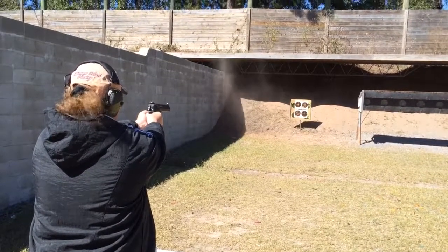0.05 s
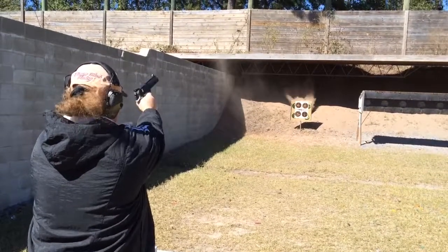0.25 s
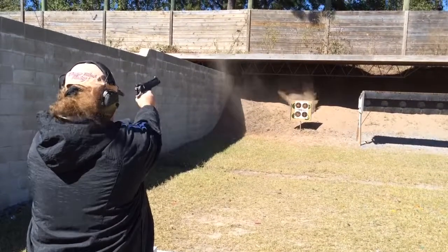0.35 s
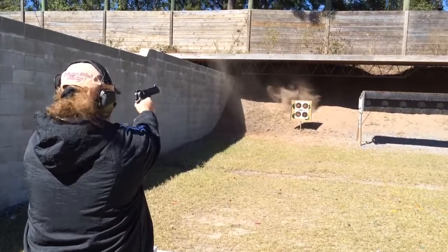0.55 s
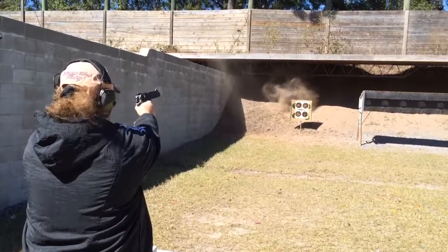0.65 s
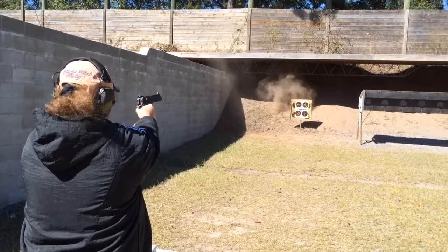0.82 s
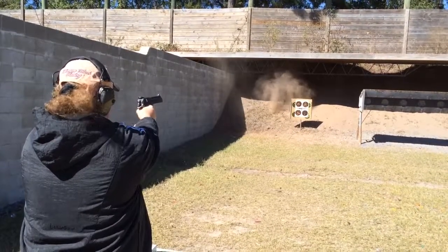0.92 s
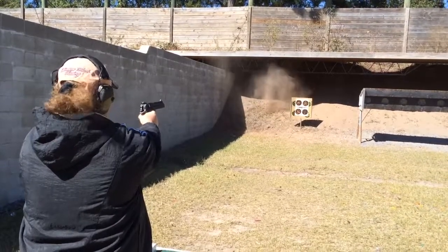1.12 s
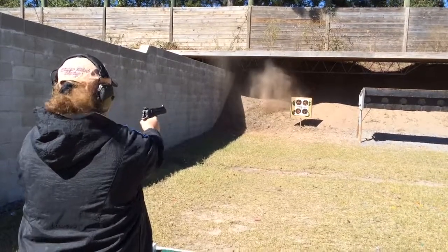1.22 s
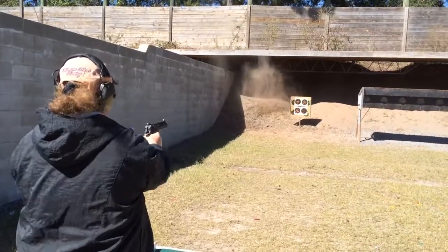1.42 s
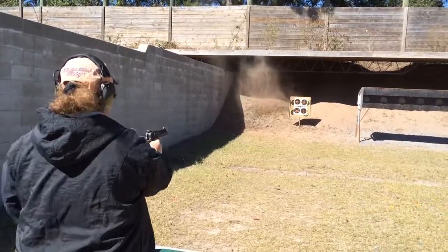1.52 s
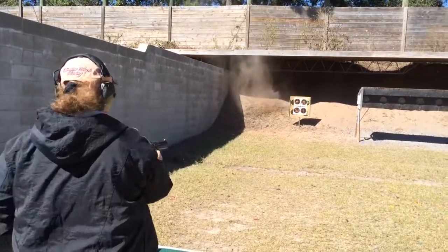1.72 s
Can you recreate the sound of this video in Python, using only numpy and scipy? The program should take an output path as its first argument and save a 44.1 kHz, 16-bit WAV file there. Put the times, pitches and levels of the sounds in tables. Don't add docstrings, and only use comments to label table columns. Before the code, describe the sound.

A single handgun shot blasts close to a phone microphone at an outdoor range, flattened by overload, followed by dense wall and berm echoes, a hollow low boom, then faint distant echoes and rising hiss.

```python
import sys
import numpy as np
from scipy import signal
from scipy.fft import rfft, irfft, next_fast_len
from scipy.io import wavfile
from scipy.ndimage import uniform_filter1d, map_coordinates

SR = 44100
rng = np.random.default_rng(int(sys.argv[2]) if len(sys.argv) > 2 else 0)


def convert_level_to_amplitude(level_db):
    exponent = np.asarray(level_db, float) / 20
    return 10 ** exponent


def output_pcm(signal):
    pcm = np.clip(np.atleast_2d(signal).T, -1, 1) * 32767
    wavfile.write(sys.argv[1], SR, np.round(pcm).astype(np.int16))


N = 77175

SHOT_S = 0.2262
TOP_HZ = 16100


def unit(x):
    return x / np.sqrt(np.mean(x ** 2) + 1e-20)


def along(points, hz):
    f, v = np.transpose(points)
    return np.interp(np.log(hz + 1), np.log(f + 1), v)


def curve(rows):
    return np.interp(np.arange(N) / SR, *np.transpose(rows))


def wobble(rate):
    knots = rng.standard_normal(int(N * rate / SR) + 4)
    return map_coordinates(knots, [np.arange(N) * rate / SR])


def filtered(x, response):
    m = next_fast_len(N + SR // 2)
    return irfft(rfft(x, m) * response(np.fft.rfftfreq(m, 1 / SR)), m)[..., :N]


def swell(t, rise, t60):
    t = np.maximum(t, 0)
    return (1 - np.exp(-t / rise)) * convert_level_to_amplitude(-60 * t / t60)


def clusters(rows, rise, blast_share, smear=0):
    blast_s = 0.00072
    u = np.arange(400) / SR / blast_s
    blast = (1 - u) * np.exp(-u)
    t, out = np.arange(N) / SR, np.zeros(N)
    for start, db, low_hz, high_hz, t60 in rows:
        noise, size = rng.standard_normal((2, N))
        hits = size ** 3 * (np.abs(size) > 2)
        pulses = np.convolve(hits, blast)[:N]
        edges = [low_hz, min(high_hz, TOP_HZ)]
        band = signal.butter(N=2, Wn=edges, btype='band', fs=SR, output='sos')
        mixed = noise + blast_share * unit(pulses)
        sound = unit(signal.sosfilt(np.vstack([band, band]), mixed))
        out += convert_level_to_amplitude(db) * swell(t - start, rise + smear * (start - SHOT_S), t60) * sound
    return out


# start in seconds, level in dB,
# lowest and highest frequency in Hz, time to fade by 60 dB in seconds.
ECHOES = [(.2262, 13, 697, 15700, 0.13), (.231, 9, 395, 3770, 0.066), (.238, 14, 430, 7440, 0.08),
          (.251, 7.5, 383, 2290, 0.39), (.277, 4, 120, 14500, 0.3), (.29, 9.5, 970, 4630, 0.32),
          (.315, 8.5, 395, 943, 0.49), (.34, 5.5, 864, 2620, 0.48), (.4, 6.5, 382, 3440, 0.35),
          (.42, 9, 231, 379, 0.3), (.52, -13, 300, 3460, 0.51), (.59, -4.5, 393, 836, 0.26),
          (.665, -3.5, 55, 720, 0.26)]


def blast_and_echoes():
    crackle_db, crackle_s = 3, 0.08
    away = np.abs(np.arange(N) / SR - SHOT_S)
    crackle = crackle_db * np.exp(-away / crackle_s) * wobble(250)
    return clusters(ECHOES, rise=0.0008, blast_share=0.96, smear=0.04) * convert_level_to_amplitude(crackle)


# frequency in Hz, level in dB per Hz.
TAIL = [(25, 0), (60, -10), (150, 2), (400, 3.5), (1000, -16), (3000, -14.5), (9000, -22.5), (16000, -42)]
# frequency in Hz, rise time in seconds.
TAIL_RISE = [(100, 0.16), (400, 0.15), (1000, 0.013), (10000, 0.05)]
# frequency in Hz, time to fade by 60 dB in seconds.
DECAY = [(60, 0.88), (200, 1.035), (600, 1.043), (1500, 1.212), (2600, 0.88), (5000, 0.66), (9000, 0.54),
         (15000, 0.31)]


def tail():
    hz, t, z = signal.stft(rng.standard_normal(N), SR, nperseg=256)
    colour = convert_level_to_amplitude(along(TAIL, hz))[:, None]
    colour = colour / np.sqrt(np.mean(colour ** 2))
    patches = uniform_filter1d(rng.standard_normal(z.shape), size=9, axis=0)
    patches = unit(uniform_filter1d(patches, size=8, axis=1))
    shape = swell(t - SHOT_S, along(TAIL_RISE, hz)[:, None], along(DECAY, hz)[:, None])
    z = z * colour * shape * convert_level_to_amplitude(0.62 * patches)
    sound = signal.istft(z, SR, nperseg=256)[1][:N]
    return convert_level_to_amplitude(16.5) * sound * (np.arange(N) > SHOT_S * SR)


# frequency in Hz, level in dB,
# change of level in dB per second on top of the shared fade.
ROOF = [(130.4, -6.5, -4.5), (177.9, -1.5, 2.5), (218.1, 0.5, -1), (259.8, -3.5, -26), (291.6, 2.5, -14.5),
        (349.6, -9.5, 4), (390, -6.5, -2), (437.8, -4, -8), (498, -12, 8), (535, -6.5, -7.5),
        (624, -4.5, -17)]
# time in seconds, level in dB.
ROOF_LEVEL = [
    (.37, -22),
    (.41, 3.5),
    (.46, -1),
    (.56, -8.5),
    (.7, -13.5),
    (.8, -21),
    (1.0, -30.5),
    (1.2, -47),
    (1.3, -63),
]


def roof():
    waver_hz, flutter_db = 9, 4.5
    t = np.arange(N) / SR
    peak_s = ROOF_LEVEL[1][0]
    ring = np.zeros(N)
    for hz, db, fade in ROOF:
        level = convert_level_to_amplitude(db + fade * (t - peak_s) + flutter_db * wobble(22.19))
        pitch = hz + waver_hz * wobble(29.91)
        ring += level * np.sin(2 * np.pi * np.cumsum(pitch) / SR)
    return convert_level_to_amplitude(curve(ROOF_LEVEL)) * ring * (t > SHOT_S)


# start in seconds, level in dB, lowest and highest frequency in
# Hz, time to fade by 60 dB in seconds.
LEAD = [
    (.204, -39.5, 1000, 15000, 0.1),
    (.214, -25.5, 100, 1740, 0.11),
]


def lead_in():
    return clusters(LEAD, rise=0.00067, blast_share=0)


# start in seconds, level in dB,
# lowest and highest frequency in Hz, time to fade by 60 dB in seconds.
CASE = [
    (.905, -42, 10900, 15000, 0.0041),
    (1.2022, -44, 9900, 16000, 0.0087),
    (1.2028, -66, 400, 8000, 0.013),
]


def spent_case():
    return clusters(CASE, rise=0.00027, blast_share=0)


# start in seconds, level in dB,
# lowest and highest frequency in Hz, time to fade by 60 dB in seconds.
FAR = [
    (.98, -24, 150, 450, .3),
    (1.095, -27, 70, 140, .15),
    (1.149, -29, 430, 640, .1),
    (1.22, -38, 300, 400, .4),
    (1.3, -40, 300, 680, 1.2),
]


def far_trees():
    return clusters(FAR, rise=0.004, blast_share=0.96)


# frequency in Hz, level in dB per Hz.
HISS = [(30, -10), (320, -8), (550, 1.5), (1400, -2), (2400, -7), (3000, -13.5), (7000, -18), (15500, -31)]
# frequency in Hz, level in dB per Hz.
RUMBLE = [(25, -30), (65, 1.5), (110, -7.5), (170, -15), (300, -24), (1000, -73)]
# time in seconds, level in dB.
GUSTS = [
    (0, -42),
    (.03, -46),
    (.1, -52),
    (.15, -48),
    (.18, -41),
    (.22, -44),
    (.5, -45),
    (1.2, -56),
    (1.75, -58),
]


def air():
    hiss = unit(filtered(rng.standard_normal(N), lambda f: convert_level_to_amplitude(along(HISS, f))))
    low = unit(filtered(rng.standard_normal(N), lambda f: convert_level_to_amplitude(along(RUMBLE, f))))
    hiss_level = convert_level_to_amplitude(-46 + 0.37 * wobble(9.4))
    gust_level = convert_level_to_amplitude(curve(GUSTS) + 4.9 * wobble(9.9))
    return hiss_level * hiss + gust_level * low


def scene():
    small = lead_in() + spent_case()
    answers = blast_and_echoes() + far_trees() + tail() + roof()
    return (answers + small + air())[None]


def low_pass(x):
    return signal.sosfilt(signal.butter(12, 17000, fs=SR, output="sos"), x)


# time in seconds, gain in dB.
GAIN = [
    (0, -2.5),
    (.2245, -2.5),
    (.2262, -23),
    (.46, -17),
    (.66, -17),
    (.9, -11.5),
    (1.18, 1.5),
    (1.4, 0.5),
    (1.75, 2),
]


def record(dry):
    limit_db, limit_s = -6.5, 0.0065
    clip, hardness = 0.7, 6
    low_hz, edge_hz = 35, 400
    x = dry * convert_level_to_amplitude(curve(GAIN))
    shift = round(limit_s * SR / 2) - 2
    power = np.abs(uniform_filter1d(x ** 2, round(limit_s * SR), axis=1, origin=shift))
    x = x / np.sqrt(np.sqrt(1 + (power / convert_level_to_amplitude(limit_db) ** 2) ** 2))
    x = x / (1 + np.abs(x / clip) ** hardness) ** (1 / hardness)

    def band_limits(f):
        treble = np.sin(np.pi / 2 * np.clip((TOP_HZ - f) / edge_hz, 0, 1)) ** 2
        bass = (1j * f / (low_hz + 1j * f)) ** 2
        return treble * bass

    return low_pass(filtered(x, band_limits))


dry = scene()
out = record(dry)
output_pcm(out)
```